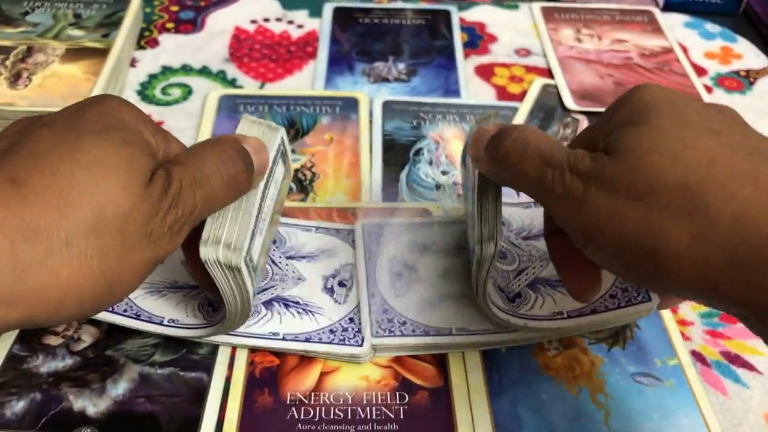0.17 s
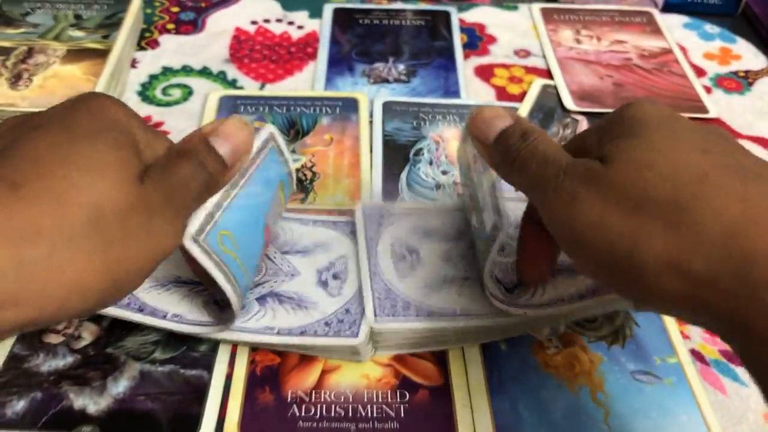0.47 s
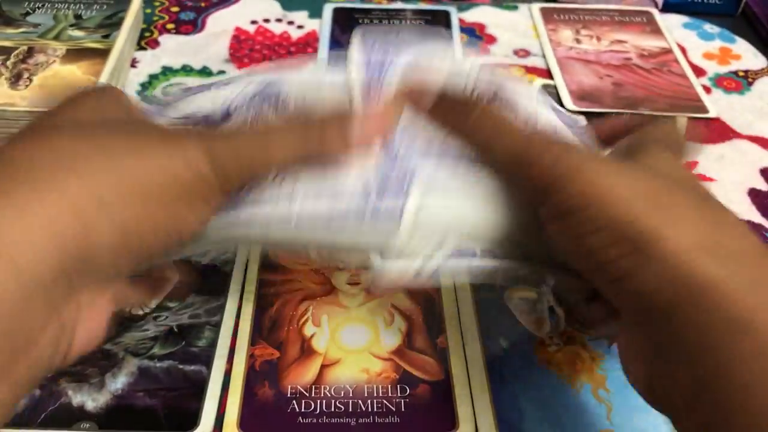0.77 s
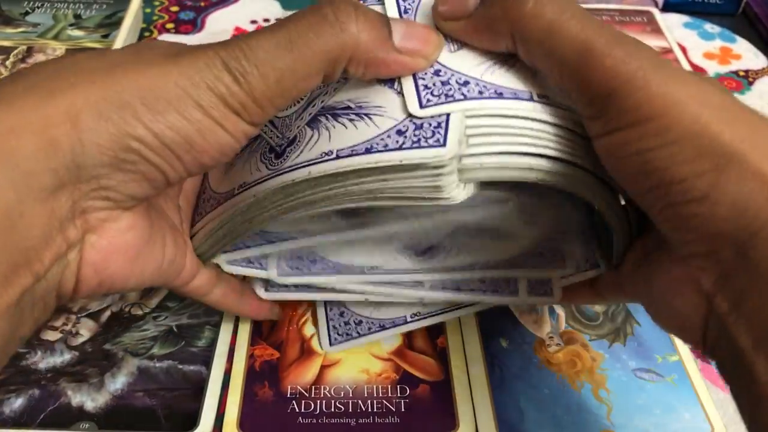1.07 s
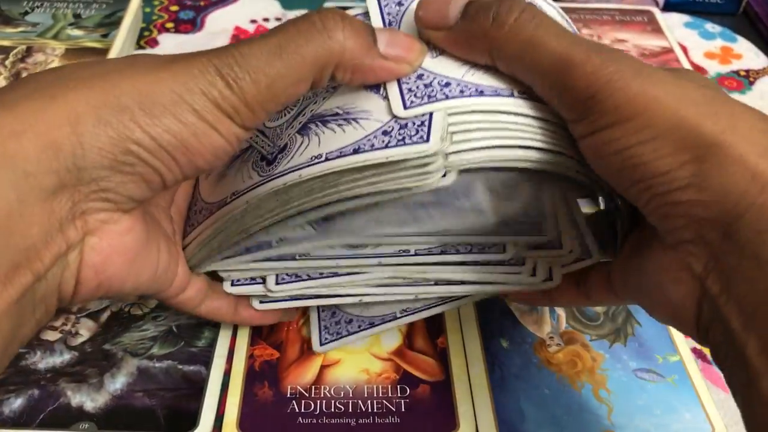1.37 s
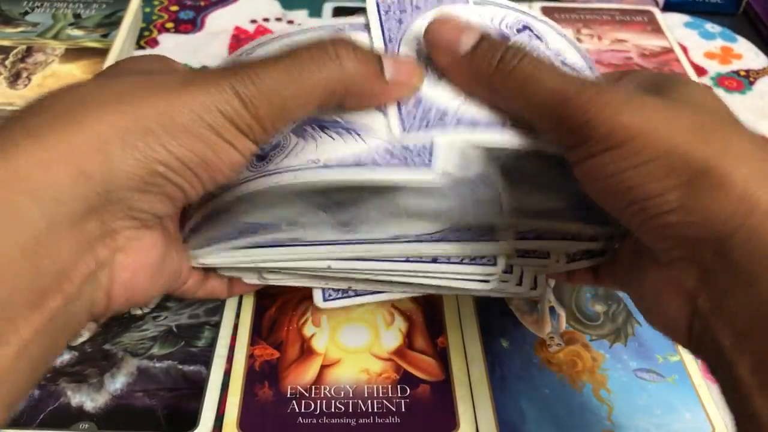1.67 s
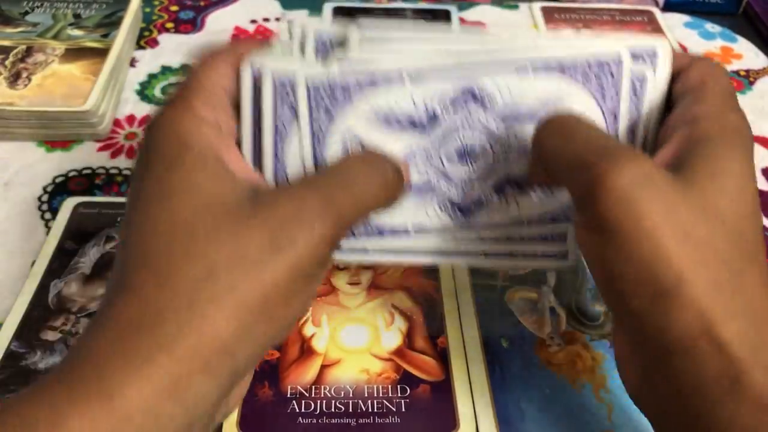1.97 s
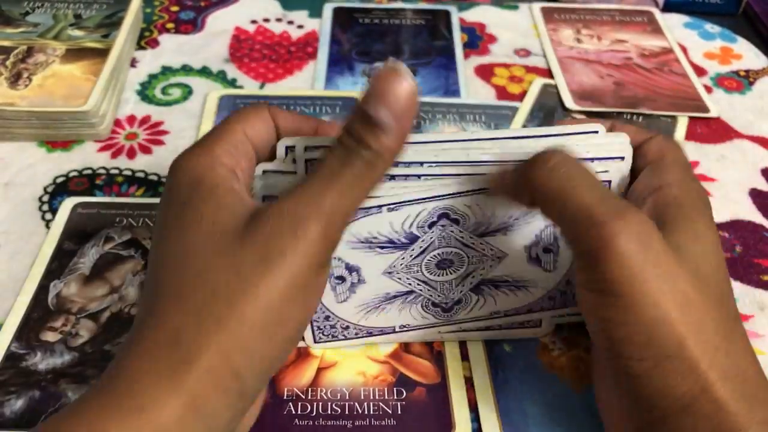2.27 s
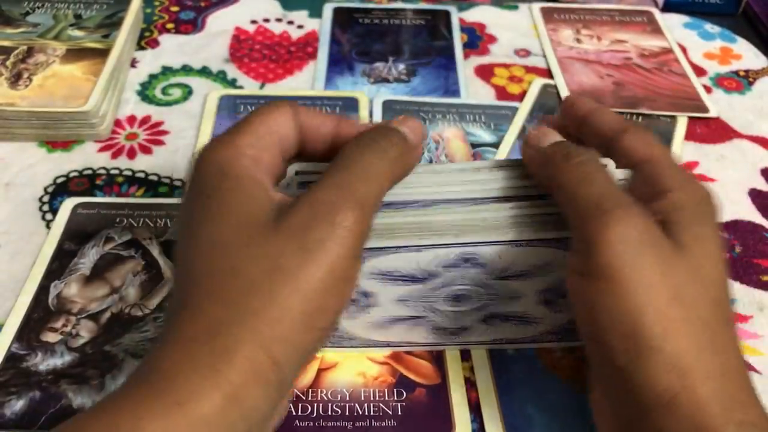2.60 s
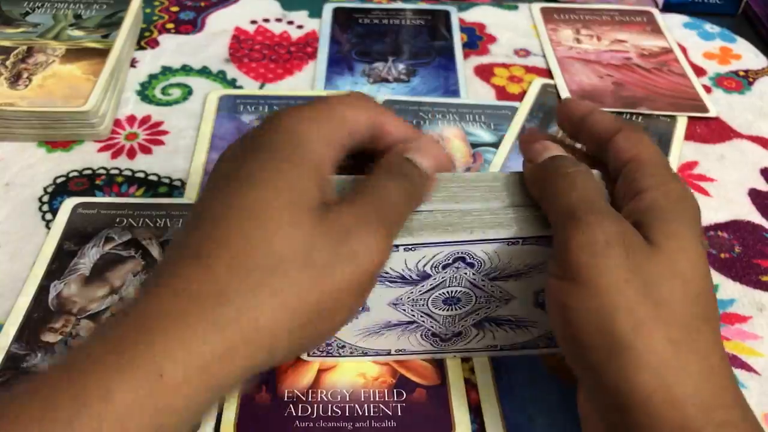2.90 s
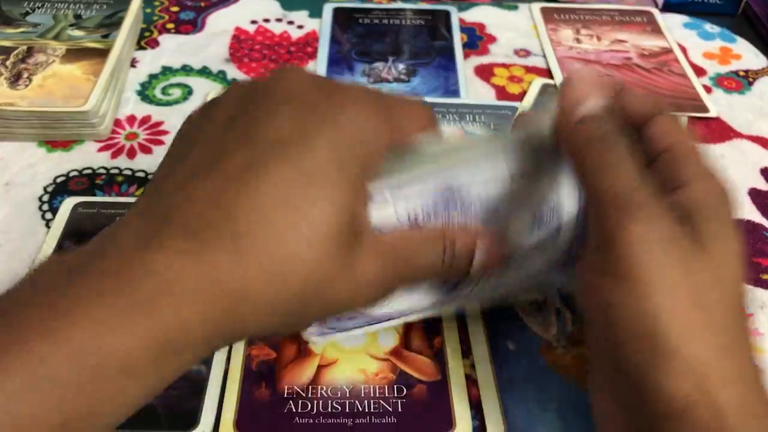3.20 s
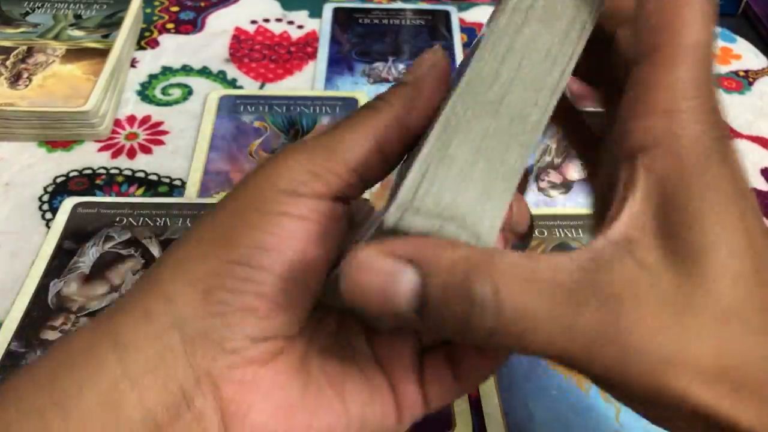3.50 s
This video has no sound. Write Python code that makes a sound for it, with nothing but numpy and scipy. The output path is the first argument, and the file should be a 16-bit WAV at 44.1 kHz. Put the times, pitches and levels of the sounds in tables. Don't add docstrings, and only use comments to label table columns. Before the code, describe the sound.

Two half decks of large stiff cards snap together rapidly, then flutter down from an arch, and are knocked square on a cloth-covered table; close microphone, little reverberation, faint low hum underneath.

```python
import sys
import numpy as np
from scipy import signal
from scipy.fft import rfft, irfft
from scipy.io import wavfile
from scipy.ndimage import uniform_filter1d

SR = 44100
rng = np.random.default_rng(int(sys.argv[2]) if len(sys.argv) > 2 else 0)


def volts_from_decibels(level):
    exponent = np.asarray(level, float) / 20
    return 10 ** exponent


def dump_mix(stems):
    frames = np.atleast_2d(stems).T
    limited = np.clip(frames, -1, 1)
    pcm = np.round(limited * 32767).astype(np.int16)
    wavfile.write(sys.argv[1], SR, pcm)


N = 160965


def riffle():
    # t/s, level/dB, edge over body/dB, ring f/Hz
    riffled_cards = [(0.0003, -24, -8, 1500), (0.0188, -31, 4, 800), (0.0495, -27, 5, 2680),
                     (0.0595, -25, 4, 2560), (0.0775, -20, 5, 4000), (0.0975, -28, 3, 730),
                     (0.1049, -25, 5, 1870), (0.12, -24, 3, 2680), (0.126, -28, 0, 1640), (0.138, -26, 2, 880),
                     (0.1445, -21, -2, 1790), (0.1561, -25, -2, 920), (0.1629, -10, 8, 3060),
                     (0.1657, -13, 5, 3500), (0.1691, -16, -4, 2560), (0.205, -25, 5, 2680),
                     (0.2266, -26, -9, 2240), (0.2425, -36, -3, 960), (0.2591, -26, -3, 800),
                     (0.2705, -23, -1, 1870), (0.2768, -24, -3, 1000), (0.2898, -23, 10, 3500),
                     (0.305, -31, 0, 730),
                     (0.3166, -24, -3, 1250), (0.3235, -14, 11, 4000), (0.3307, -21, 0, 2340),
                   (0.3378, -22, 8, 3060), (0.3456, -22, -8, 800), (0.3719, -21, -5, 1430),
                   (0.3875, -17, -8, 2560), (0.4089, -14, -3, 1560), (0.4294, -23, -3, 1710),
                   (0.4427, -14, 6, 4000), (0.4765, -30, -6, 3200), (0.4875, -12, -1, 3060),
                   (0.4952, -21, -1, 1710), (0.5033, -24, 2, 1640), (0.51, -12, 4, 2930),
                   (0.5127, -16, -2, 1500), (0.5258, -14, -5, 3350), (0.535, -17, 5, 4000),
                   (0.5379, -13, 7, 4000), (0.5407, -14, -5, 2680), (0.5492, -20, 4, 2800),
                   (0.5613, -22, 1, 700), (0.5684, -12, 6, 2930), (0.5717, -12, 10, 3060),
                   (0.5779, -18, 1, 2930), (0.5937, -15, 1, 700), (0.5992, -19, 9, 3350)]
    return cards(riffled_cards, over_db=-9, width_hz=1800, contact_s=.001, table_db=-14)


def cascade():
    # t/s, level/dB, edge over body/dB, ring f/Hz
    card_drops = [(1.0902, -31, 4, 1790), (1.111, -27, 9, 2800), (1.1202, -29, 6, 3660),
                  (1.132, -28, 5, 4000), (1.1515, -33, 10, 4000), (1.1675, -25, 9, 1560),
                  (1.1725, -18, 19, 4000), (1.2009, -28, 12, 4000), (1.2243, -30, 19, 4000),
                  (1.2533, -32, 8, 3060), (1.2833, -28, 10, 4000), (1.3247, -36, 1, 1250),
                  (1.365, -37, 3, 2050), (1.4105, -35, 3, 1370), (1.4296, -33, 4, 700),
                  (1.4505, -19, 10, 4000), (1.4795, -33, 4, 4000), (1.4928, -30, -1, 1960),
                  (1.5066, -25, 1, 4000), (1.5435, -23, 8, 4000), (1.5615, -31, 5, 1960),
                  (1.5657, -30, 12, 4000), (1.5908, -29, 3, 1790), (1.609, -21, 16, 3830),
                  (1.6874, -29, -4, 1870), (1.6934, -24, -2, 1710), (1.7212, -18, 7, 4000),
                  (1.736, -24, 5, 2140), (1.7631, -23, 3, 1960), (1.7765, -27, -9, 1960),
                  (1.7945, -19, 5, 4000), (1.805, -31, 0, 3830), (1.8181, -29, -5, 2240),
                  (1.829, -33, -4, 700), (1.8362, -29, 7, 3060), (1.8479, -27, 14, 4000),
                  (1.8769, -34, 13, 4000), (1.8987, -24, 14, 4000)]
    return cards(card_drops, over_db=-9, width_hz=1400, contact_s=.0012, table_db=-17)


def knocks():
    # t/s, level/dB,
    # edge over body/dB, ring f/Hz
    packets = [(1.0665, -32, -22, 1090), (2.1411, -29, -27, 880), (2.1458, -29, -19, 1140),
               (2.1497, -31, -19, 1090), (2.1668, -28, -21, 1200), (2.1737, -20, -20, 1000),
               (2.1809, -18, -11, 920), (2.189, -17, -11, 1140), (2.1938, -21, -13, 1050),
               (2.1973, -18, -10, 1090), (2.4484, -25, -8, 1560), (2.4654, -36, -21, 1560),
               (2.5265, -33, -22, 1000), (2.5329, -21, -24, 920), (2.5405, -26, -16, 1310),
               (2.5461, -24, -16, 1090), (2.5536, -23, -14, 1050), (2.5591, -25, -19, 960),
               (2.5806, -23, -10, 1700), (2.618, -33, -12, 1500), (2.6336, -29, -14, 1140),
                (2.6469, -32, -12, 1090), (2.6568, -28, -14, 1600), (2.6925, -29, -13, 920),
                (2.7193, -27, -15, 900), (2.7495, -33, -19, 960), (2.7555, -28, -14, 920),
                (2.856, -36, -14, 1140), (2.8645, -33, -16, 1310), (2.868, -22, -14, 1500),
                (2.8727, -16, -18, 1900), (2.8819, -20, -17, 1250), (2.8927, -22, -14, 920),
                (2.8965, -22, -8, 1050)]
    return cards(packets, over_db=-11, width_hz=600, contact_s=.0015, table_db=-33)


def ticks():
    # t/s, level/dB, edge over body/dB, ring f/Hz
    handling = [(0.755, -46, 9, 4000), (0.7693, -40, 9, 4000), (0.8164, -37, 4, 3200),
                (0.949, -48, -14, 1000), (0.9594, -42, -2, 2560), (2.044, -45, -4, 1870),
                (2.0632, -38, -1, 2560), (2.0952, -42, -5, 2450), (2.12, -48, -5, 1640),
                (2.3291, -46, -13, 880), (3.1866, -40, 14, 4000), (3.1896, -39, -9, 960),
                (3.5498, -47, -9, 1050),
                (2.3652, -47, -8, 1000),
        (2.4153, -44, -16, 1140),
        (2.4267, -43, -16, 1000),
        (2.5078, -44, 18, 4000),
        (2.811, -41, -12, 770),
        (3.494, -53, -16, 960),
        (3.571, -52, -8, 920),
    ]
    return cards(handling, over_db=-9, width_hz=1200, contact_s=.0008, table_db=-34)


def cards(rows, over_db, width_hz, contact_s, table_db):
    # f/Hz, level/dB
    edge_spectrum = [(900, -9), (4200, -1), (6500, -5), (12000, -6), (16000, -11)]
    # f/Hz, width/Hz, level/dB
    table_modes = [(65, 60, -5), (150, 70, 0), (290, 130, 0), (750, 600, -3)]
    lead_s, rise_s = .005, .0005
    drag_db, drag_s = -8, .005
    snap_db, puff_s = 8, .00025
    t = np.arange(-lead_s, .035, 1 / SR)
    hz_axis = np.fft.rfftfreq(len(t), 1 / SR)
    out = np.zeros((2, N + SR))
    for s, db, edge_db, hz in rows:
        noise, grain = rng.standard_normal((2, len(t)))
        pick = np.clip(rng.standard_normal(4), -2, 2)
        fall_s = contact_s * volts_from_decibels(2.5 * pick[0] - .3 * max(edge_db, 0))
        rise = np.exp(t / rise_s / volts_from_decibels(2.5 * pick[3]))
        drag = volts_from_decibels(drag_db) * (1 - np.exp(-t / drag_s)) * np.exp(-t / drag_s)
        shape = np.where(t < 0, rise, np.exp(-t / fall_s) + drag)
        snap = volts_from_decibels(snap_db) * np.sign(pick[1]) * (abs(t) == abs(t).min())
        touch = shape * noise * volts_from_decibels(3.5 * grain) + snap

        ring = resonate(resonate(touch, hz, width_hz), hz, 2 * hz)
        overtone = resonate(resonate(touch, 2.2 * hz, 1.5 * hz), 2.2 * hz, 3.0 * hz)
        body = ring + volts_from_decibels(over_db) * overtone
        tilt = volts_from_decibels(.45 * min(edge_db, 0) * np.log2(1 + hz_axis / 3000))
        edge = irfft(rfft(coloured(touch, edge_spectrum)) * tilt, len(t))
        share = 1 / (1 + volts_from_decibels(-2 * edge_db - 6.0))
        hit = np.sqrt(share) * evened(edge) + np.sqrt(1 - share) * evened(body)
        peak = np.sqrt(uniform_filter1d(hit ** 2, size=50).max())

        u = np.maximum(t - .002 * abs(pick[3]), 0) / puff_s
        force = u * np.exp(-u) + 1.5 * noise * np.exp(-abs(t) / drag_s)
        push = volts_from_decibels(table_db + 1.5 * pick[2] - .55 * db - .3 * edge_db) * force
        at = round(s * SR)
        out[:, at:at + len(t)] += volts_from_decibels(db) * np.array([hit / peak, push])
    board, push = out[:, round(lead_s * SR):][:, :N]
    modes = sum((-1) ** k * volts_from_decibels(db) * resonate(push, f, w) for k, (f, w, db) in enumerate(table_modes))
    return board + modes


def settling():
    # start t/s, end t/s, level/dB, f/Hz
    rattle = [
        (.405, .6, -38, 1250),
        (2.53, 2.79, -42, 1000),
    ]
    taps = uniform_filter1d(grit(700, 3.5), size=20) * rng.standard_normal(N)
    chatter = 0
    for start, end, db, hz in rattle:
        low = resonate(resonate(taps, hz, 550), hz, 1500)
        chatter = chatter + volts_from_decibels(db) * during(start, end) * evened(low + .25 * resonate(taps, 2600, 1800))
    thump_s, thump_hz, thump_db = .59, 120, -33
    t = np.maximum(np.arange(N) / SR - thump_s, 0)
    boom = np.sin(2 * np.pi * thump_hz * t) * np.exp(-t / .02)
    return chatter + volts_from_decibels(thump_db) * boom


def thuds():
    # t/s, peak level/dB, f/Hz
    slaps = [(.0599, -33, 210), (.1049, -33, 210), (.3195, -26, 258), (.5032, -27, 340), (.5392, -26, 380),
             (.5615, -24, 300), (.5696, -19, 344), (.5938, -27, 160), (1.6932, -27, 290),
             (1.7226, -33, 279), (1.7773, -34, 220), (1.7945, -30, 279), (2.1717, -31, 322),
             (2.146, -40, 220)]
    swing_cycles = .38
    t = np.arange(N) / SR - .002
    out = np.zeros(N)
    for s, db, hz in slaps:
        swell = np.exp(-((t - s) * hz / swing_cycles) ** 2 / 2)
        out += volts_from_decibels(db) * swell * np.cos(2 * np.pi * hz * (t - s))
    return out


def sliding():
    # start t/s, end t/s, level/dB
    rubs = [(0, .6, -48), (.6, .98, -60), (.75, .82, -60), (.87, .92, -60), (.99, 1.07, -50),
            (1.08, 1.86, -42), (1.88, 2.52, -64), (2.53, 2.79, -64), (3.05, 3.085, -58), (3.15, 3.25, -66),
            (3.46, 3.7, -69)]
    # f/Hz, level/dB
    face_spectrum = [(300, -4), (2000, 0), (4000, -3), (12500, -2), (16000, -10)]
    slow = uniform_filter1d(uniform_filter1d(rng.standard_normal(N), size=300), size=300)
    flicker = volts_from_decibels(3.0 * evened(slow))
    catches = 1 + 12 * uniform_filter1d(grit(330, 4.5), size=40)
    hiss = rng.standard_normal(N) * flicker * catches
    return evened(coloured(hiss, face_spectrum)) * sum(volts_from_decibels(db) * during(a, b) for a, b, db in rubs)


def room(x):
    # f/Hz, T60/s
    decay_times = [(300, .3), (2000, .3), (6000, .22), (14000, .15)]
    taps = np.zeros(SR // 2)
    at = np.arange(160, len(taps) - 20, 20)
    taps[at + rng.integers(0, 20, len(at))] = rng.choice([-1., 1.], len(at))
    hz, t, z = signal.stft(taps, SR, nperseg=256)
    t60 = read(decay_times, hz)[:, None]
    z = z * volts_from_decibels(-60 * t / t60)
    z = z * np.sqrt(t60) / np.linalg.norm(z, axis=1, keepdims=True)
    tail = signal.istft(z, SR, nperseg=256)[1]
    return signal.fftconvolve(x, tail / np.linalg.norm(tail))[:N]


def air():
    # f/Hz, level/dB per Hz
    tone_spectrum = [(55, -1), (90, -6), (300, -14), (700, -24), (2900, -31), (6000, -37), (16000, -40)]
    a, b, c = rng.standard_normal((3, N))
    hum_hz, hum_width_hz = 157, 14
    hum = volts_from_decibels(-65) * evened(resonate(resonate(b, hum_hz, hum_width_hz), hum_hz, hum_width_hz))
    squeak = volts_from_decibels(-75) * during(3.26, 3.45) * evened(resonate(c, 3700, 110))
    return volts_from_decibels(-59) * evened(coloured(a, tone_spectrum)) + hum + squeak


def evened(x):
    return x / np.sqrt(np.mean(x ** 2) + 1e-20)


def read(points, hz):
    f, value = np.transpose(points)
    return np.interp(np.log(hz + 1), np.log(f + 1), value)


def coloured(x, points):
    hz = np.fft.rfftfreq(len(x), 1 / SR)
    low_cut = np.minimum(hz / points[0][0], 1) ** 2
    return irfft(rfft(x) * volts_from_decibels(read(points, hz)) * low_cut, len(x))


def resonate(x, hz, width_hz):
    return signal.lfilter(*signal.iirpeak(hz, hz / width_hz, SR), x)


def during(start, end):
    t = np.arange(N) / SR
    return np.clip(np.minimum(t - start, end - t) / .025 + .5, 0, 1)


def grit(per_s, size_db):
    return (rng.random(N) < per_s / SR) * volts_from_decibels(size_db * np.minimum(rng.exponential(1, N), 4))


def scene():
    deck = riffle() + cascade() + knocks() + settling() + thuds() + ticks()
    return (deck + volts_from_decibels(-16.5) * room(deck) + sliding() + air())[None]


def roll_off(x):
    return signal.sosfilt(signal.butter(12, 16980, fs=SR, output="sos"), x)


def record(dry):
    mix = signal.oaconvolve(dry, signal.firwin(255, 15900, fs=SR)[None], "same")
    return roll_off(mix)


dry = scene()
out = record(dry)
dump_mix(out)
```